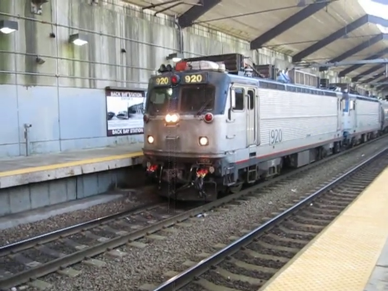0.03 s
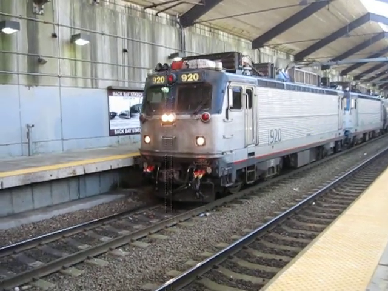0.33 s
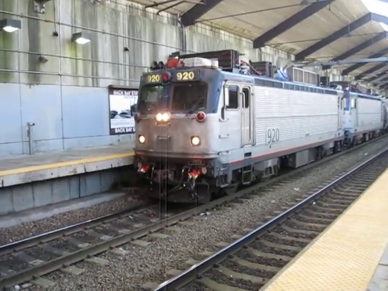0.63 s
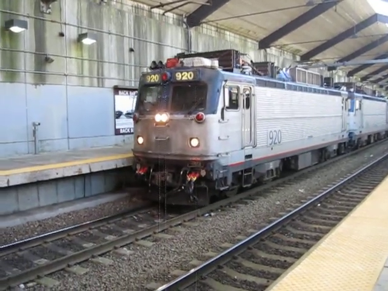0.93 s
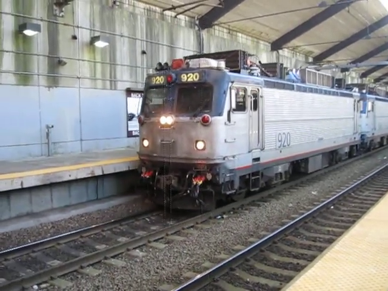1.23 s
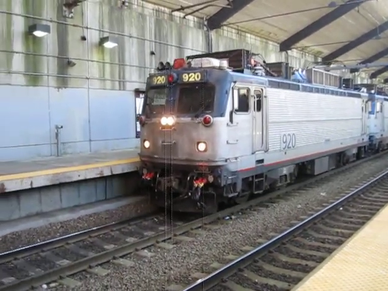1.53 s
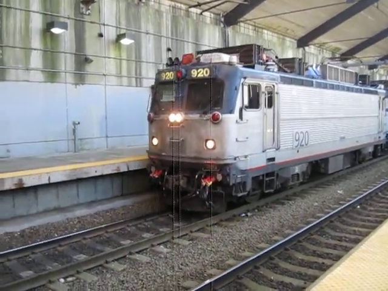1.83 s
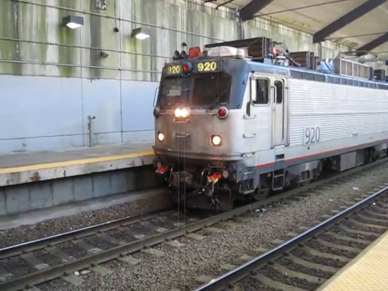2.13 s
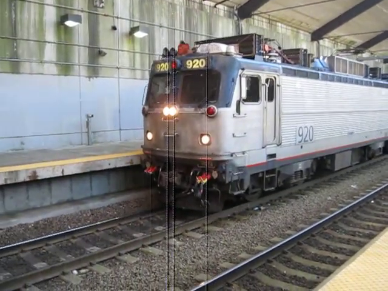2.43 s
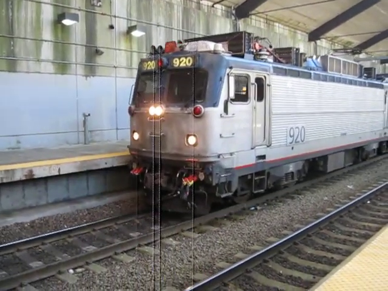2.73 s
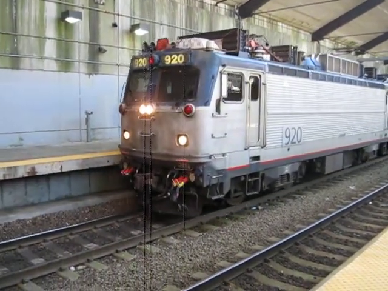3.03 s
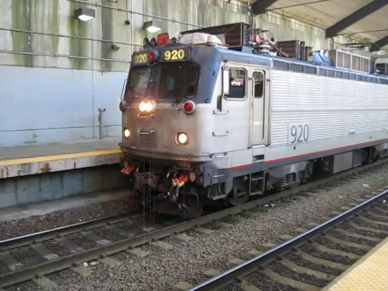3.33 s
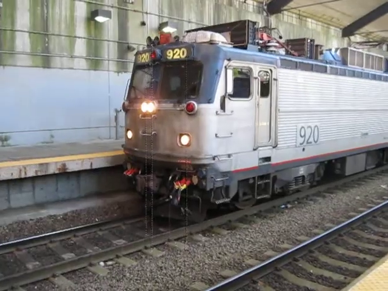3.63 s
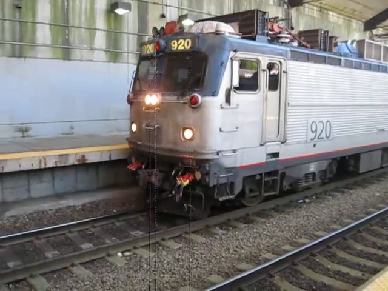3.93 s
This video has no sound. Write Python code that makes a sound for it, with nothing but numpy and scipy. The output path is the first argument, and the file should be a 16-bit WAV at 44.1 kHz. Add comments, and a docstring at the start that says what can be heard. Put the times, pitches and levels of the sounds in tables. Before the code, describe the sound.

An electric locomotive rolls slowly through a covered station, its blowers roaring steadily for all four seconds with a deep drone and uneven rushes of air. Underneath, the wheels rumble and ring faintly in short bouts, with soft scuffs clustered from about 0.9 to 1.6 seconds and a few later. One faint dry tick comes near 3.4 seconds. The walls and roof add a light echo, and the treble is dull.

```python
"""An electric locomotive rolls slowly through a covered station, its blowers roaring.
Cooling air drones in the body, booms through broad duct resonances and rushes at the grilles.
Underneath, the wheels rumble, scuff and sing in short bouts on the rails. Wall and roof smear it all;
a small camera rounds the peaks and cuts the treble near 6 kHz. One faint dry tick sounds near the end."""
import sys
import numpy as np
from scipy import signal
from scipy.fft import rfft, irfft
from scipy.io import wavfile
from scipy.ndimage import uniform_filter1d

SR = 44100
rng = np.random.default_rng(int(sys.argv[2]) if len(sys.argv) > 2 else 0)


def persist_wave(psi):
    """Save psi, clipped to +-1, as 16-bit WAV."""
    counts = np.round(np.clip(psi, -1, 1) * 32767).astype(np.int16)
    wavfile.write(sys.argv[1], SR, np.atleast_2d(counts).T)


N = 176400

# low end of the rolling wheels: pitch_hz, relative_db
RUMBLE_EQ = [(20, -33.5), (32, -24.5), (38, 4.5), (48, -1), (65, -1.5), (90, -4), (160, -41.5)]
# fader on the rumble: time_s, level_db
RUMBLE_FADER = [(0, -45.5), (.6, -40), (1.15, -40), (1.55, -45), (2.05, -53), (2.2, -38.5), (2.8, -39.5),
                (3.1, -45.5), (3.7, -38), (4, -41.5)]
# hiss of steel scraping on steel: pitch_hz, relative_db
SCRAPE_EQ = [(900, -14), (1800, -1), (2400, -1.5), (3100, -2), (3800, -4), (4150, -6), (4700, -4),
             (5250, -5.5), (5700, -18.5), (6200, -10.5)]
# fader on the scrape: time_s, level_db
SCRAPE_FADER = [(0, -32.5), (.45, -33), (.75, -33.5), (.92, -32), (1.02, -35.5), (1.15, -31.5),
                (1.3, -33.5), (1.7, -30.5), (2.13, -33.5), (2.35, -36), (2.55, -37.5), (2.72, -39),
                (3.2, -33), (3.38, -44.5), (3.7, -41.5), (4, -42.5)]
# short scuffs of wheel against rail: peak_s, level_db
SCUFFS = [(.87, -30.5), (1.1, -38), (1.28, -35), (1.39, -32), (1.565, -34.5), (2.13, -35.5), (2.69, -35),
          (3.86, -39)]
# ringing modes of the wheel discs: pitch_hz, half_width_hz, relative_db
WHEEL_MODES = [(2500, 90, -2), (3303, 75, -2), (3775, 110, 0), (4820, 140, -5), (5050, 400, -4.5)]
# fader on the wheel ring: time_s, level_db
RING_FADER = [(0, -38.5), (.7, -44), (1, -48), (1.3, -43), (1.65, -45.5), (1.95, -43), (2.2, -48),
              (2.5, -43.5), (3.1, -48.5), (4, -45.5)]
# a rubbing wheel sings in one mode: start_s, length_s, pitch_hz, half_width_hz, level_db
WHEEL_SINGS = [(0, 0.56, 4810, 44.5, -48.5), (.83, 0.14, 4710, 89.4, -45.5), (1.03, .44, 4655, 100.4, -42),
               (1.14, .36, 2450, 39.7, -42.5), (1.52, .35, 4610, 139, -43.5), (1.66, .1, 2610, 90, -43),
               (2, 0.2, 4620, 95, -44.5), (2.06, .28, 4770, 75, -46), (2.64, 0.52, 2500, 219, -41.5),
               (3.48, .11, 5030, 354, -41), (3.8, .2, 3344, 38.9, -44), (3.85, 0.14, 5130, 40, -49.5)]

# deep drone of the blowers: pitch_hz, relative_db
DRONE_EQ = [(33, -52), (45, -20.5), (90, -12.5), (120, -5.5), (155, 0.5), (200, 0), (290, -0.5),
            (420, -18.5), (900, -41), (2000, -53.5)]
# fader on the drone: time_s, level_db
DRONE_FADER = [(0, -28.5), (.1, -25.5), (.22, -27), (.32, -28), (.58, -30.5), (.79, -27.5), (.95, -31),
               (1.1, -27), (1.3, -29.5), (1.64, -33.5), (1.8, -32.5), (2.03, -30), (2.15, -27), (2.32, -33),
               (2.6, -27.5), (2.76, -31.5), (2.86, -25), (3, -30.5), (3.18, -24.5), (3.32, -34.5),
               (3.48, -25.5), (3.62, -31), (3.92, -24.5), (4, -31.5)]
# bright rush of air at the grilles: pitch_hz, relative_db
GRILLE_EQ = [(400, -25), (850, -2), (1200, 3), (1600, -1), (2000, -2.5), (2600, -4.5), (3050, -7.5),
             (3350, -4.5), (3550, -8.5), (4050, -11), (4800, -10), (5400, -21.5), (6200, -22.5)]
# fader on the rush: time_s, level_db
GRILLE_FADER = [(0, -31), (.45, -31.5), (.65, -36), (.88, -31), (1, -35.5), (1.09, -29), (1.17, -38.5),
                (1.28, -28.5), (1.5, -37), (2.03, -35.5), (2.15, -30), (2.4, -34.5), (2.7, -30),
                (2.95, -31.5), (3.25, -28.5), (3.38, -31.5), (3.47, -31.5), (3.56, -33), (3.68, -33.5),
                (3.92, -29), (4, -32.5)]
# roar of blower turbulence: pitch_hz, relative_db
ROAR_EQ = [(33, -46.5), (45, -18.5), (90, -17), (120, -8), (155, -8.5), (260, -2), (330, -0.5), (430, -1.5),
           (530, -3), (720, -4), (1000, -9.5), (1600, -18), (3000, -22.5), (6000, -32.5)]
# fader on the roar and its ducts: time_s, level_db
ROAR_FADER = [(0, -23.5), (.14, -23), (.3, -24.5), (.46, -22.5), (.65, -24), (.9, -23.5), (1.05, -24.5),
              (1.35, -25), (1.5, -23.5), (2, -23.5), (2.42, -23), (2.95, -23.5), (3.3, -22.7),
              (3.55, -24.5), (3.72, -21.5), (4, -23)]
# air duct resonances: pitch_hz, half_width_hz, relative_db
DUCT_MODES = [(180, 13, -8), (262, 36, -6), (377.4, 37, -2), (434, 53, -0.5), (609, 33, -2)]
# hollow swells of the roar: start_s, length_s, pitch_hz, half_width_hz, level_db
ROAR_SURGES = [(.06, .12, 563, 55, -29), (.65, 0.1, 301, 35, -28), (.76, .22, 678, 130, -28.5),
               (1.05, .15, 205.4, 30, -30.5), (1.25, 0.14, 728, 140, -30), (1.3, 0.16, 354, 50, -30),
               (1.34, 0.53, 618, 28, -36.5), (2.07, 0.14, 564, 45.3, -32.5), (2.16, 0.15, 445, 45, -27),
               (3.21, 0.13, 436, 40.6, -25.5), (3.42, .1, 812, 45, -33), (3.86, 0.092, 1013, 220, -34.5)]

DUCT_DB = -6.5  # ducts against the turbulence
SWELL_FADE_S, SCUFF_HALF_LENGTH_S, RUB_FLICKER_DB = 0.073, 0.051, 1.0
HALL_T60_S, HALL_WET_DB, PREDELAY_S = 1.3, -11, .025
TICK_S, TICK_DB, TICK_DECAY_S = 3.4233, -17.3, .00015
PEAK_CEILING, KNEE_HARDNESS = .31, 6
HIGH_CUT_HZ, TICK_HIGH_CUT_HZ = 5820, 15800


def gain(db):
    """Decibels to gain."""
    return 10 ** (np.asarray(db) / 20)


def unit_rms(x):
    """Scale to rms 1."""
    return x / np.sqrt(np.mean(x ** 2))


def fader(points):
    """Gain that rides through (time_s, level_db) points."""
    return gain(np.interp(np.arange(N) / SR, *np.array(points).T))


def flutter(depth_db, rate_hz):
    """Wavering gain: random steps, smoothed twice, depth_db rms deep."""
    hold = max(int(SR / rate_hz), 1)
    steps = rng.standard_normal(N)[np.arange(N) // hold]
    smooth = uniform_filter1d(uniform_filter1d(steps, hold), hold)
    return gain(depth_db * unit_rms(smooth))


def shaped_noise(eq):
    """Noise coloured by (pitch_hz, relative_db) points, at rms 1."""
    hz, db = np.array(eq).T
    freqs = np.maximum(np.arange(N // 2 + 1) * SR / N, 1)
    colour = gain(np.interp(np.log(freqs), np.log(hz), db))
    return unit_rms(irfft(rfft(rng.standard_normal(N)) * colour, N))


def resonances(modes, waver_db, waver_hz):
    """Noise-driven modes, each wavering by itself, mixed to rms 1."""
    freqs = np.maximum(np.arange(N // 2 + 1) * SR / N, 1)
    mix = 0
    for hz, half_width, db in modes:
        band = 1 / (1 + 1j * (freqs / hz - hz / freqs) * hz / (2 * half_width))
        ring = unit_rms(irfft(rfft(rng.standard_normal(N)) * band ** 2, N))
        mix = mix + ring * gain(db) * flutter(waver_db, waver_hz)
    return unit_rms(mix)


def swells(cues):
    """Single resonances that fade in, hold and fade out."""
    t = np.arange(N) / SR
    mix = 0
    for start, length, hz, half_width, db in cues:
        inside_s = np.minimum(t - start, start + length - t)
        envelope = np.clip(.5 + inside_s / SWELL_FADE_S, 0, 1)
        tone = resonances([(hz, half_width, 0)], waver_db=-0.5, waver_hz=24.7)
        mix = mix + tone * envelope * gain(db)
    return mix


def high_cut(x, hz):
    """Steep low-pass without delay."""
    taps = signal.firwin(241, hz, window=("kaiser", 8), fs=SR)
    return signal.fftconvolve(x, taps[None], mode="same")


def station_reverb(direct):
    """Direct sound plus a dense tail from wall and roof, already ringing at the start."""
    t = np.arange(N) / SR
    tail = rng.standard_normal(N) * np.exp(-np.log(1000) * t / HALL_T60_S) * (t > PREDELAY_S)
    wet = irfft(rfft(direct) * rfft(unit_rms(tail)), N) / np.sqrt(N)
    return (direct + gain(HALL_WET_DB) * wet) / np.hypot(1, gain(HALL_WET_DB))


def tick():
    """One faint, dry tick: an instant attack that dies at once."""
    age = (np.arange(N) - int(TICK_S * SR)) / SR
    return gain(TICK_DB) * np.exp(-np.abs(age) / TICK_DECAY_S) * (age >= 0)


def wheels():
    """Rolling shakes the track; uneven rubbing hisses, scuffs and makes the wheel discs ring and sing."""
    t = np.arange(N) / SR
    rumble = shaped_noise(RUMBLE_EQ) * fader(RUMBLE_FADER)
    scuffs = sum(gain(db) * np.exp(-((t - peak_s) / SCUFF_HALF_LENGTH_S) ** 2) for peak_s, db in SCUFFS)
    scrape = shaped_noise(SCRAPE_EQ) * np.hypot(fader(SCRAPE_FADER), scuffs)
    ring = resonances(WHEEL_MODES, waver_db=1.5, waver_hz=13.0) * fader(RING_FADER)
    rubbing = scrape + ring + swells(WHEEL_SINGS)
    return rumble + rubbing * flutter(RUB_FLICKER_DB, rate_hz=25)


def blowers():
    """Cooling air drones in the body, roars in the ducts and rushes at the grilles, swelling unevenly."""
    drone = shaped_noise(DRONE_EQ) * fader(DRONE_FADER)
    ducts = resonances(DUCT_MODES, waver_db=1.0, waver_hz=6.2) * gain(DUCT_DB)
    roar = (shaped_noise(ROAR_EQ) + ducts) * fader(ROAR_FADER)
    rush = shaped_noise(GRILLE_EQ) * fader(GRILLE_FADER) * flutter(depth_db=0.41, rate_hz=12)
    return drone + roar + swells(ROAR_SURGES) + rush


def scene():
    """Blowers and wheels under the station roof, in mono."""
    return station_reverb(blowers() + wheels())[None]


def record(dry):
    """The camera rounds the highest peaks and dulls the top end; only the tick stays bright."""
    rounded = dry / (1 + np.abs(dry / PEAK_CEILING) ** KNEE_HARDNESS) ** (1 / KNEE_HARDNESS)
    dulled = high_cut(rounded, HIGH_CUT_HZ)
    return high_cut(dulled + tick(), TICK_HIGH_CUT_HZ)


dry = scene()
out = record(dry)
persist_wave(out)
```